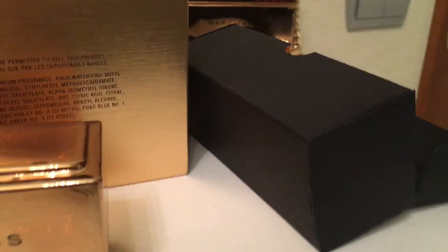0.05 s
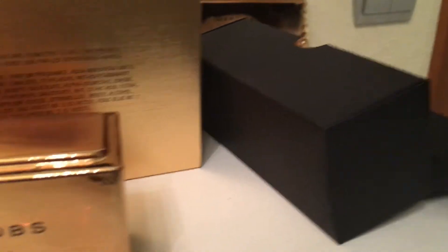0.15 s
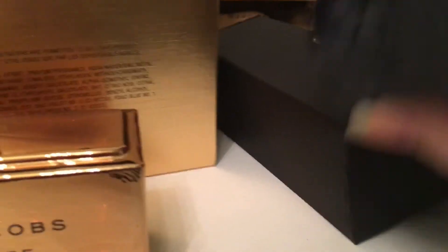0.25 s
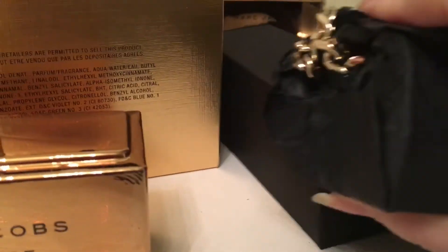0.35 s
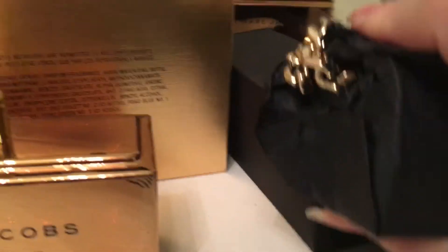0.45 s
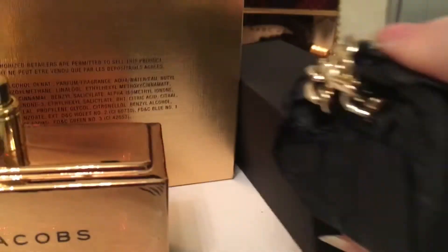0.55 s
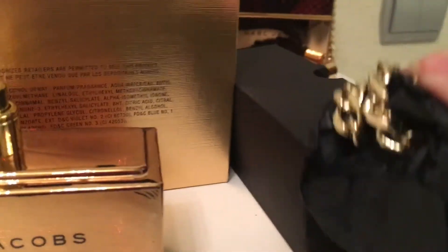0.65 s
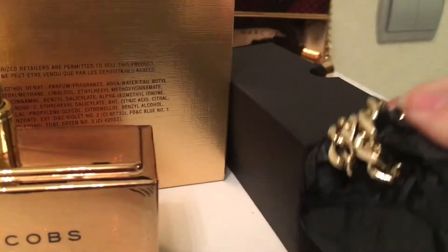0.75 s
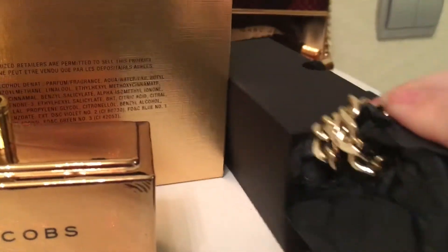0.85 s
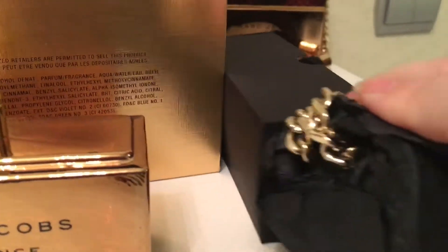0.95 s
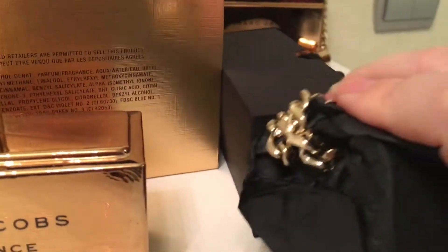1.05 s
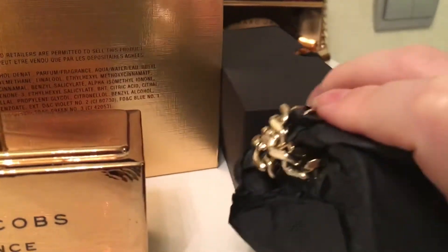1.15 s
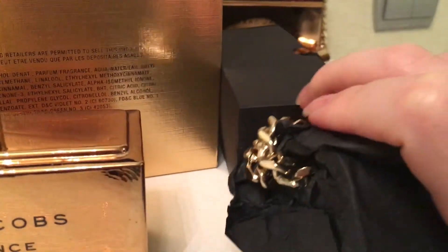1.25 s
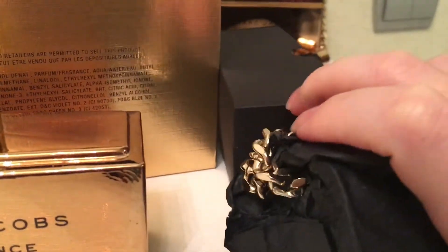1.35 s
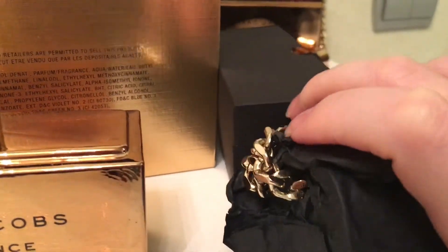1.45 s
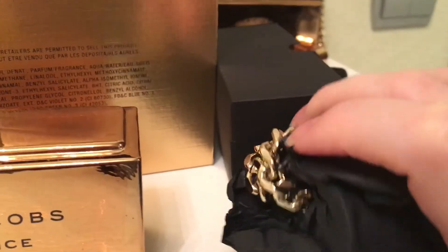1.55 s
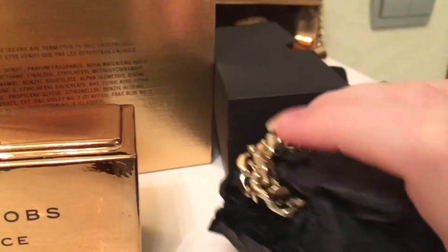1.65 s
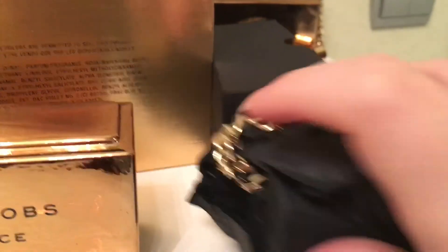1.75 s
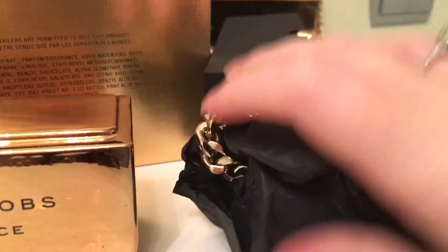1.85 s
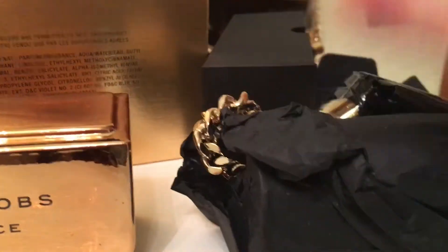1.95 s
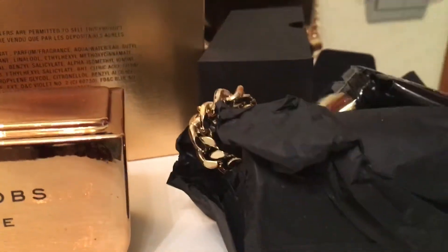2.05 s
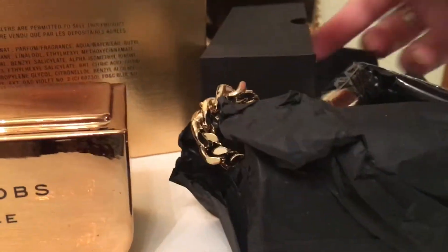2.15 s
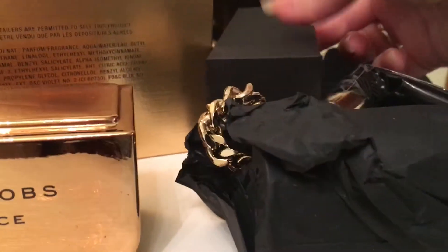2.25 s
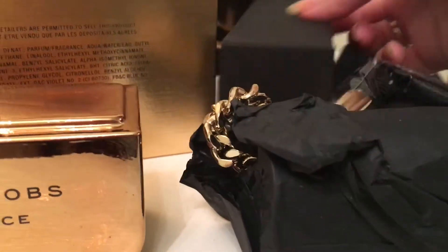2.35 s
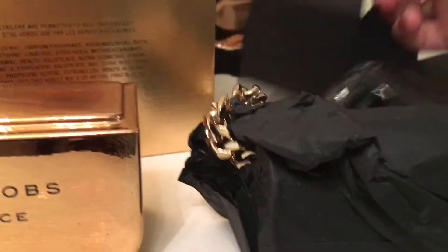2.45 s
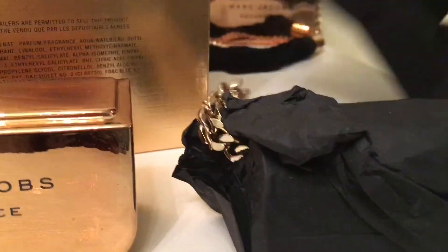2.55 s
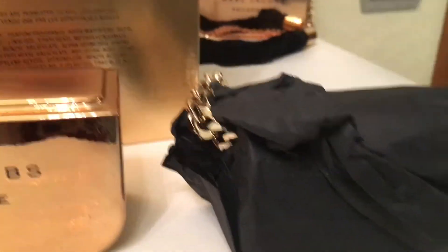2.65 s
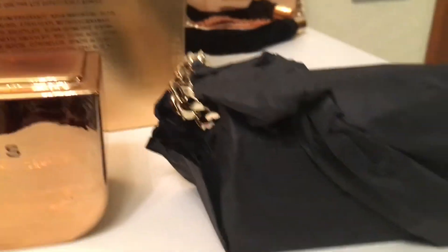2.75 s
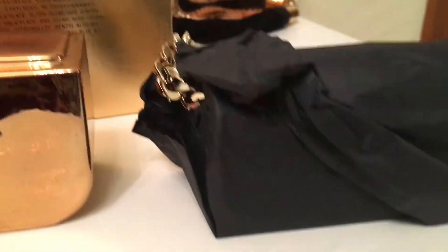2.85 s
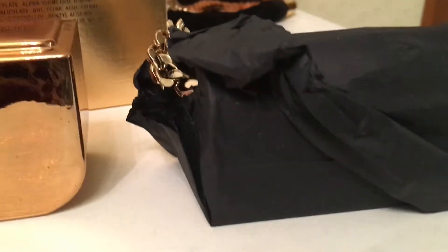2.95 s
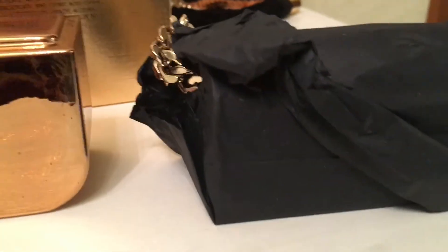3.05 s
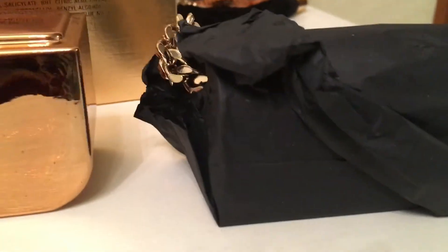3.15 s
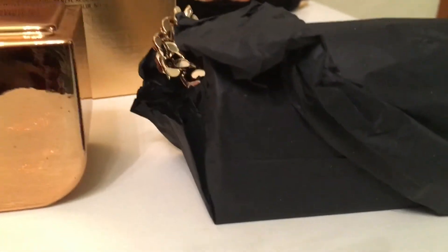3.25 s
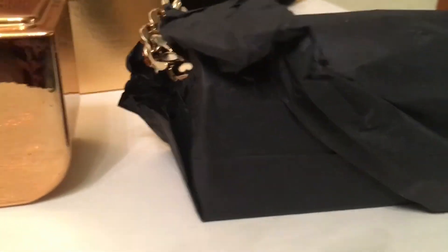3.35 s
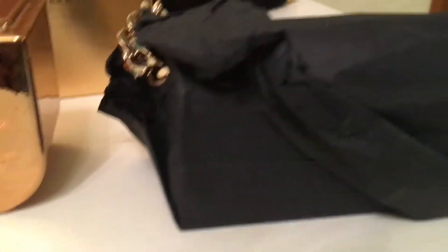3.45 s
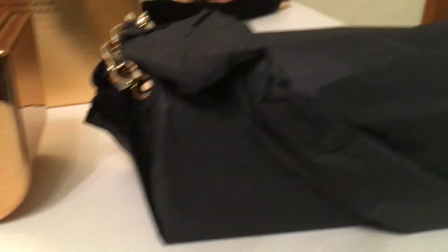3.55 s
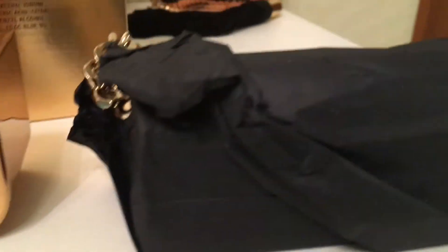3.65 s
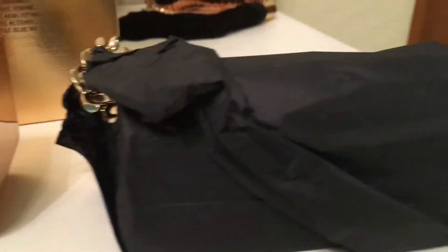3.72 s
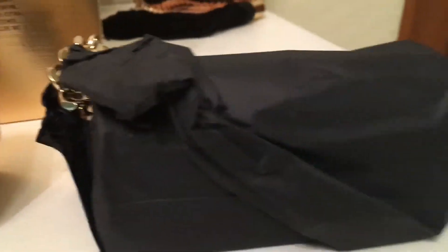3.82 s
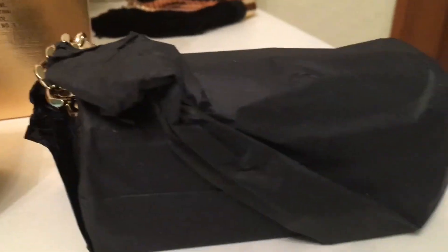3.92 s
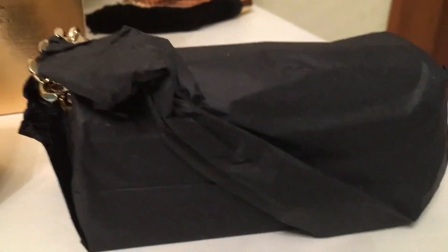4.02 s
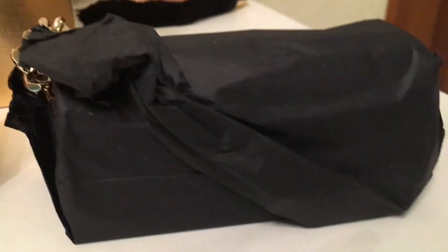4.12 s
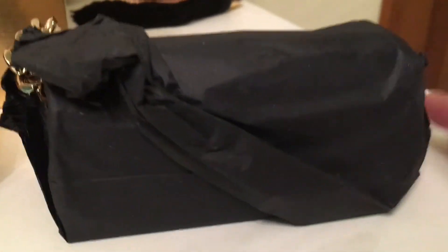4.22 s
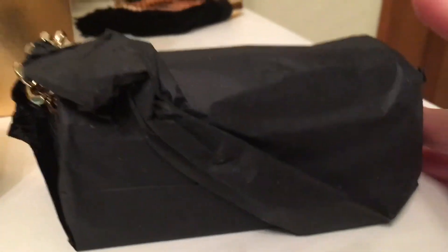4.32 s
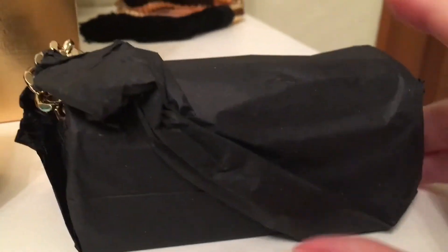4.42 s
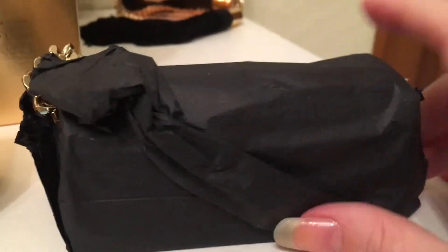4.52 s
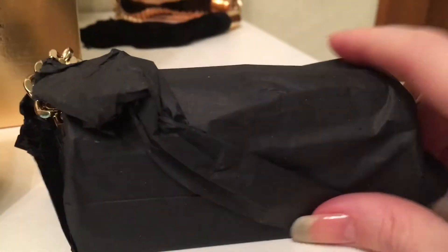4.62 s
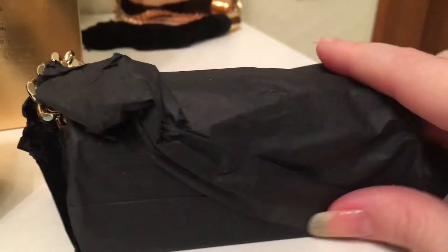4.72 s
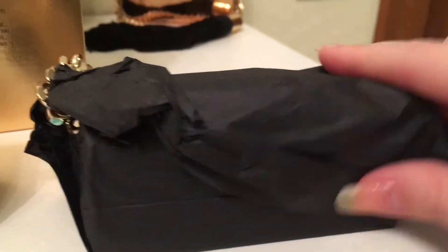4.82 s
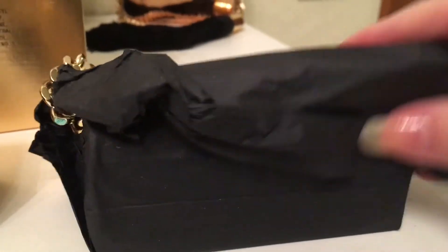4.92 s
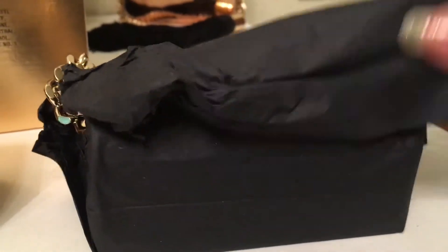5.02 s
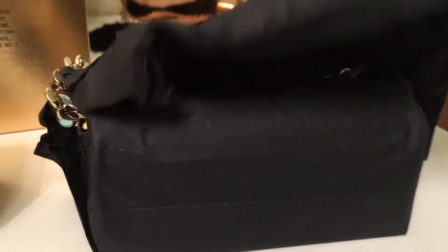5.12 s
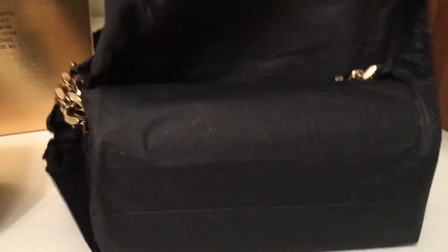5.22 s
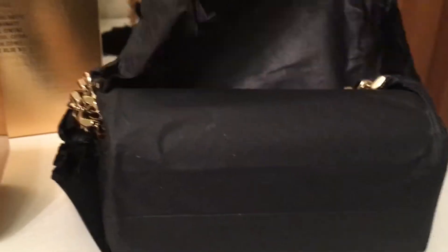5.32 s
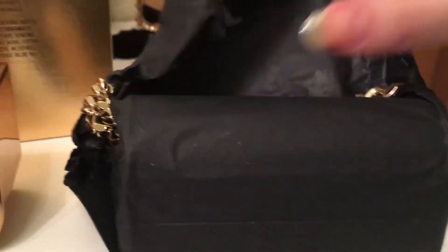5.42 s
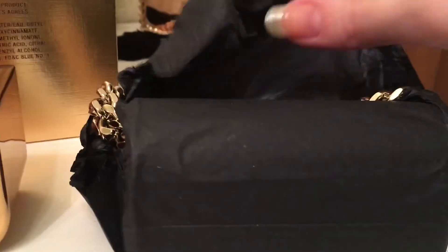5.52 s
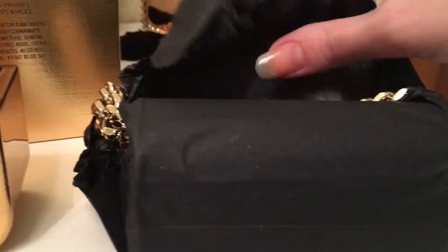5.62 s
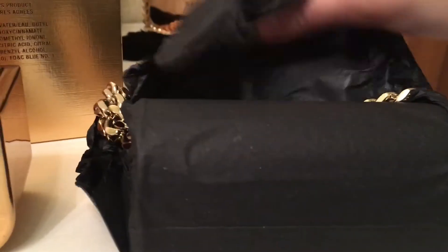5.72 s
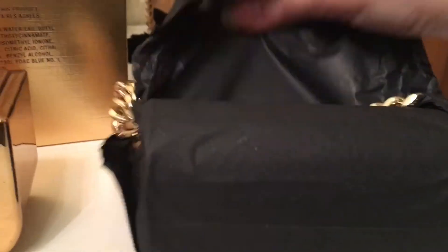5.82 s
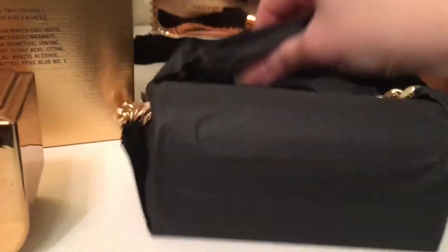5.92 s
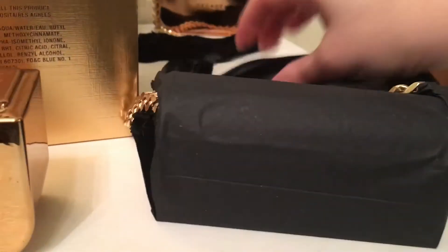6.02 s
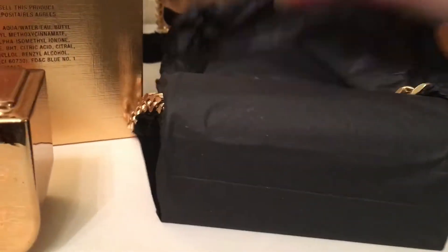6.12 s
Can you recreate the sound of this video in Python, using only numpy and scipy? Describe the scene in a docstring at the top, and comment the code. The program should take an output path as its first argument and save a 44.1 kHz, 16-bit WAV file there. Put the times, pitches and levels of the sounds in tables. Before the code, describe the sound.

Close crinkling tissue, soft padded thuds, a quiet pause broken by one hollow cardboard clack, then brisk, bright paper rustling in a quiet small room.

```python
"""Handbag unwrapped from tissue paper

Hands pull a handbag wrapped in thin tissue out of a gift box, close to the microphone; later the tissue is
peeled back. Tissue: flipping facets and rubbing noise, plus ticks, snaps and puffs of air. Bag: soft bumps
from damped table modes. Card: creaks and taps of band-passed noise; the empty box is put down a little
further off with a hollow knock. A small room of decaying noise answers, over a quiet ambience."""
import sys
import numpy as np
from scipy import signal
from scipy.fft import rfft, irfft, next_fast_len
from scipy.io import wavfile
from scipy.ndimage import uniform_filter1d, map_coordinates

SR = 44100
rng = np.random.default_rng(int(sys.argv[2]) if len(sys.argv) > 2 else 0)


def put_to_file(sound):
    """Save the sound as 16-bit audio at rate SR, in the file named by the first command-line argument."""
    columns = np.atleast_2d(sound).T  # one column per channel
    safe = np.clip(columns, -1, 1)
    whole_steps = np.round(safe * 32767)
    wavfile.write(sys.argv[1], SR, whole_steps.astype(np.int16))


N = 272538  # samples

# paper spectra: freq_hz, relative_db
SHEET_SPECTRUM = [(250, -33.5), (450, -31.5), (620, -2.5), (820, -3.5), (1100, 0), (1700, -0.5),
                  (2500, -1.5), (3400, -6), (4600, -6.5), (8000, -51)]
CREASE_SPECTRUM = [(1500, -45), (3000, -2.5), (4100, -2), (6400, 1.5), (9000, 1), (12500, 1), (15500, -5.5)]
FLAP_SPECTRUM = [(20, -37), (40, -7), (70, -4), (150, -4), (220, -2.5), (320, -5), (450, -8), (800, -14.5),
                 (2000, -89)]
BUCKLE_DB = -70.5  # crease level below which the paper mostly rubs


def tissue(sheet_db, hiss_db, flap_db, rub_db=-1, hiss_rub_db=-1, catch_db=2.0, flap_trim_db=-0.5):
    """Flipping facets over rubbing noise; buckling takes a larger share as the pull hardens."""
    fold_hz, fold_db = fold()
    pull = amp(hiss_db) + amp(-50)
    facets = crackle(pull, count=9000, size_spread_db=4.0, centre_hz=2350, spread=0.58, cycles=7.9)
    creases = crackle(pull, count=10000, size_spread_db=5.0, centre_hz=8750, spread=0.25, cycles=1.2)
    buckling = amp(hiss_db) / (amp(hiss_db) + amp(BUCKLE_DB))

    sheet_rub = amp(rub_db) * coloured(rng.standard_normal(N), SHEET_SPECTRUM)
    sheet = unit(buckling * unit(coloured(facets, SHEET_SPECTRUM)) + sheet_rub)
    sheet = folded(sheet, patchy_db=2, fold_hz=fold_hz, fold_db=fold_db)

    hiss_rub = amp(hiss_rub_db) * coloured(rng.standard_normal(N), CREASE_SPECTRUM)
    hiss = unit(buckling * unit(coloured(creases, CREASE_SPECTRUM)) + hiss_rub)
    hiss = folded(hiss, patchy_db=1.43)

    flap = coloured(rng.standard_normal(N), FLAP_SPECTRUM)
    catch = amp(catch_db * wobble(130))  # the sheet catches and slips
    rustle = catch * (amp(sheet_db) * sheet + amp(hiss_db) * hiss)
    return rustle + amp(flap_db + flap_trim_db) * flap


def crackle(pull, count, size_spread_db, centre_hz, spread, cycles, size=160):
    """Tiny facets flip over, each ringing at its own pitch; the harder the pull, the more of them."""
    starts = np.searchsorted(np.cumsum(pull) / np.sum(pull), rng.random(count)).clip(0, N - 1)
    # most buckles are tiny, a few are large; crowded ones share the energy
    sizes = amp(size_spread_db * np.minimum(rng.exponential(size=count), 4))
    sizes = sizes * rng.choice([-1, 1], count) / np.sqrt(pull[starts])
    hz = np.clip(centre_hz * np.exp(spread * rng.standard_normal((count, 1))), 300, SR / 2.6)
    turns = hz * np.arange(size) / SR
    # fade counted in turns: 60 dB in `cycles`
    grains = sizes[:, None] * np.sqrt(hz) * np.sin(2 * np.pi * turns) * fade(turns, cycles)
    places = starts[:, None] + np.arange(size)
    return unit(np.bincount(places.ravel(), grains.ravel(), N + size)[:N])


def folded(x, patchy_db, fold_hz=1500, fold_db=0, octaves=0.25):
    """The colour shifts as the paper changes shape: a moving resonance and passing patches."""
    hz, t, z = signal.stft(x, SR, nperseg=512)
    patches = uniform_filter1d(rng.standard_normal(z.shape), size=4, axis=0)
    patches = unit(uniform_filter1d(patches, size=9, axis=1))
    frames = np.minimum((t * SR).astype(int), N - 1)
    centre, height = [np.broadcast_to(c, N)[frames] for c in (fold_hz, fold_db)]
    distance = np.log2((hz[:, None] + 1) / centre) / octaves
    resonance_db = height * (np.exp(-distance ** 2 / 2) - .7)
    return signal.istft(z * amp(patchy_db * patches + resonance_db), nperseg=512)[1][:N]


# hand slides the tissue along, and at 3.476 s the box scrapes: start_s, length_s, rise_s, level_db,
# treble_rel_db, bass_rel_db, fold_pitch_hz, fold_prominence_db
SLIDES = [(0.035, .24, .005, -51, -1.5, -12, 1513, 2), (.43, .11, .025, -40.5, -9, -9.5, 1170, 2.5),
          (.57, .16, .02, -61, -2, -18, 1200, -1), (0.747, .27, .005, -48.5, -9, -5.5, 1120, -2),
          (1.01, .62, .02, -46, -4.5, -12, 1330, 4), (1.649, .26, .11, -38.5, -2.5, -11.5, 1750, 1.5),
          (2.334, .275, .045, -44, -5.5, -11, 1225, 3.5), (2.662, .81, .25, -62, -14, 1, 1270, 1.5),
          (3.476, .13, 0.0037, -47, -7, -5.5, 2530, 1.5), (3.66, .6, 0.06, -71, -4, 6.5, 1500, -3.5),
          (4.25, .25, .08, -47.5, -4, -17.5, 1630, 10.5), (4.53, .24, .03, -39, 0, -20, 1880, 6),
          (4.771, .455, .02, -37, 2.5, -13, 1540, 5.5), (5.25, .13, .03, -50, -1, -2.5, 1580, 0.5),
          (5.385, .275, .015, -45.5, 1, -8, 1570, -0.5), (5.649, .315, .06, -35, -2.5, -8.5, 1300, 0),
          (5.981, .05, .02, -48, -6, -12, 1210, 0)]
# brief tugs: peak_s, half_length_s, level_db, treble_rel_db, bass_rel_db
TUGS = [(.315, .018, -28.5, -.5, -8), (.535, .008, -35, -2, -7.5), (1.113, .015, -43, 0, -12),
        (1.414, .018, -42.5, 0, -26), (1.588, .022, -37, 2, -13), (1.881, .002, -30, -7, -25),
        (1.903, .012, -44, 4, -23), (2.44, .012, -38, -8, -4.5), (2.522, .006, -31, 0, -18),
        (2.934, .022, -47.5, -9, -29), (3.14, 0.013, -52, -13.5, -8), (3.263, 0.024, -53, -15.5, -7),
        (3.498, .011, -37, -7, -8.5), (4.495, .014, -39, -2, -24), (4.601, .016, -31, -.5, -16.5),
        (4.659, .008, -36, -1, -10), (4.79, .009, -31, 1, -36), (4.85, .016, -33.5, 2, -11.5),
        (5.004, .012, -42, 7, -20), (5.129, .01, -37.5, 3, -6), (5.213, .008, -35, -2, -4),
        (5.52, .01, -41, 4, -24), (5.708, .018, -33, 3, -6), (5.768, .009, -27, 2, -5),
        (5.85, .025, -36, -1, -11), (6.113, .014, -49, -3.5, -8.5)]
# paper at rest in the hand: sheet_db, creases_db, flapping_db
STILL_DB = [-71, -73, -88]
SETTLE_T60_S = .17  # after a slide
TUG_RELAX = 1.1  # sech release scale, in half lengths


def handling():
    """Slides build, hold and settle; tugs swell and relax; returns sheet, crease and flap levels in dB."""
    t = np.arange(N) / SR
    power = np.outer(amp(STILL_DB) ** 2, np.ones(N))
    for start_s, length_s, rise_s, db, treble_db, bass_db, _, _ in SLIDES:
        settling = fade(np.maximum(t - start_s - length_s, 0), SETTLE_T60_S)
        effort = np.clip((t - start_s) / rise_s, 0, 1) * settling
        power += np.outer(amp([db, db + treble_db, db + bass_db]) ** 2, effort ** 2)
    for peak_s, half_length_s, db, treble_db, bass_db in TUGS:
        u = np.clip((t - peak_s) / half_length_s, -20, 20)
        effort = np.where(u < 0, np.exp(-u ** 2 / 2), 1 / np.cosh(u / TUG_RELAX))
        power += np.outer(amp([db, db + treble_db, db + bass_db]) ** 2, effort ** 2)
    return 10 * np.log10(power)


def fold():
    """Pitch and prominence of the rubbed fold, gliding from mid-slide to mid-slide."""
    start_s, length_s, *_, hz, db = np.transpose(SLIDES)
    t = np.arange(N) / SR
    return [np.interp(t, start_s + length_s / 2, column) for column in (hz, db)]


TICK_FROM_DB = -66  # crease level above which ticks set in


def ticks(hiss_db, count=260, level_db=-55, follow=0.25, scatter_db=3.5, centre_hz=8500, spread=0.5,
          t60_s=0.0016):
    """Small creases give way one by one, standing out most under gentle handling."""
    moving = np.cumsum(np.clip(hiss_db - TICK_FROM_DB, 0, 8))
    track, t = np.zeros(N), np.arange(SR // 200) / SR
    for moment, size, pitch in rng.random((count, 3)):
        start = np.searchsorted(moving, moment * moving[-1])
        hz = np.clip(centre_hz * np.exp(spread * 2 * (2 * pitch - 1)), 2000, 14000)
        band = signal.butter(1, [hz * .6, hz * 1.4], "bandpass", fs=SR)
        tick = signal.lfilter(*band, rng.standard_normal(len(t)) * fade(t, t60_s))
        db = level_db + follow * (hiss_db[start] + 64) + scatter_db * 2 * (2 * size - 1)
        add(track, start / SR, amp(db) * onset_unit(tick, .004))
    return track


# creases that buckle with a snap: start_s, pitch_hz, ring_db, crack_db (ring before its trim)
SNAPS = [(.0335, 3550, -28, -25.5), (.1185, 2356, -56.5, -39), (.141, 2640, -49, -38),
         (.2228, 2955, -37, -39), (.368, 1770, -29, -42), (.3864, 2490, -42, -33.5),
         (.7355, 1563, -42, -46), (.5413, 1980, -33, -34), (.799, 3820, -40.5, -38),
         (1.0287, 2900, -27, -39), (1.0392, 1700, -27, -29.5), (1.0606, 3540, -26, -33),
         (1.0847, 2530, -28.5, -31.5), (1.111, 2750, -18, -38), (1.124, 2290, -53, -22.5),
         (1.3021, 2800, -25, -44), (1.344, 3100, -27, -37), (1.4051, 1560, -27, -31.5),
         (1.4565, 3360, -29, -31.5), (1.836, 3860, -27, -33), (1.8803, 1930, -28.5, -45),
         (1.9719, 1540, -43, -40), (2.1036, 2330, -40.5, -45.5), (2.1505, 2210, -55, -52),
         (2.1644, 2920, -58, -44), (2.3631, 5460, -31, -34.5), (2.4277, 1520, -31, -57),
         (2.444, 1270, -18, -49), (2.5241, 1050, -17.5, -32), (2.528, 1880, -23, -23),
         (2.6077, 3020, -32.5, -35.5), (3.184, 1260, -45, -51), (3.3764, 3670, -47, -43),
         (4.4372, 2060, -29.5, -63.5), (4.5049, 3120, -29, -25), (4.5122, 3100, -24.5, -31.5),
         (4.544, 2500, -45, -24), (4.6583, 1740, -28.5, -36), (4.7051, 2410, -28, -29),
         (4.792, 1690, -46, -27.5), (4.863, 2900, -18.5, -21.5), (5.019, 2540, -26.5, -27.5),
         (5.21, 2130, -23.5, -44), (5.708, 2120, -48, -21.5), (5.8102, 2480, -22, -45)]
# crack spectrum: freq_hz, relative_db
CRACK_SPECTRUM = [(800, -49), (3000, -1.5), (6500, 0), (9000, -1.5), (13000, -4), (16000, -8.5)]


def snaps(rows, cycles=8, crack_t60_s=0.0062, shiver_t60_s=0.025, shiver_db=-16, ring_trim_db=-4,
          thin_hz=3200, thin_db=14):
    """A crease gives way with a bright crack and a short shiver; the facet beside it rings briefly."""
    rings, cracks, t = np.zeros(N), np.zeros(N), np.arange(SR // 40) / SR
    for start_s, hz, ring_db, crack_db in rows:
        facet = np.sin(2 * np.pi * hz * t) * fade(t, cycles / hz)
        decay = fade(t, crack_t60_s) + amp(shiver_db) * fade(t, shiver_t60_s)
        crack = rng.standard_normal(len(t)) * decay
        # the less the facet rings, the thinner the crack
        edge_hz = np.clip(thin_hz * 2 ** ((crack_db - ring_db) / thin_db), 800, 9000)
        crack = signal.lfilter(*signal.butter(1, edge_hz, "highpass", fs=SR), crack)
        add(rings, start_s, amp(ring_db + ring_trim_db) * onset_unit(facet, .004))
        add(cracks, start_s, amp(crack_db) * onset_unit(crack, .004))
    # such small facets radiate little bass
    rings = signal.lfilter(*signal.butter(2, 800, "highpass", fs=SR), rings)
    return rings + coloured(cracks, CRACK_SPECTRUM)


def small_snaps(hiss_db, count=70, level_db=-38, follow=0.44, scatter_db=3, crack_rel_db=-2, centre_hz=2400,
                spread=0.46):
    """Lesser creases give way at random as the paper moves, louder under a harder pull: rows like SNAPS."""
    moving = np.cumsum(np.clip(hiss_db + 58, 0, 6))
    moments = (np.arange(count) + rng.random(count)) / count
    starts = np.searchsorted(moving, moments * moving[-1])
    pitch, ringing, cracking = rng.standard_normal((count, 3)).clip(-2, 2).T
    db = level_db + follow * (hiss_db[starts] + 48)
    hz = centre_hz * np.exp(spread * pitch)
    return list(zip(starts / SR, hz, db + scatter_db * ringing, db + crack_rel_db + scatter_db * cracking))


# lifted sheet wafts air at the microphone: peak_s, half_length_s, level_db
WAFTS = [(5.128, 0.06, -51), (5.715, 0.017, -37), (5.78, 0.018, -46), (5.924, 0.028, -47)]
WAFT_HZ = 68


def wafts(width=0.58):
    """A broad sheet swung through the air gives a soft, low puff: swelling band-passed noise."""
    t = np.arange(N) / SR
    push = sum(amp(db) * np.exp(-((t - peak_s) / half_length_s) ** 2 / 2) for peak_s, half_length_s, db in WAFTS)
    band = signal.butter(2, [WAFT_HZ / (1 + width), WAFT_HZ * (1 + width)], "bandpass", fs=SR)
    return push * unit(signal.lfilter(*band, rng.standard_normal(N)))


# soft bumps on the table: start_s, level_db (before trim), contact_brightness_hz
BUMPS = [(0.052, -46.5, 438), (0.278, -31.5, 422), (.748, -34.5, 1030), (.8, -40, 600), (0.879, -39.5, 993),
         (.938, -20, 845), (1.602, -17, 824), (2.525, -32, 243), (2.586, -49, 300), (2.667, -43.5, 1110),
         (2.81, -48.5, 129), (5.074, -36.5, 248), (5.232, -23.5, 221)]
# table top modes: freq_hz, relative_db, t60_s
TABLE_MODES = [(134.5, 4, 0.09), (177, 3, 0.062), (223, -1, 0.13), (268, 0, 0.086), (340, 7.5, 0.082),
               (420, -14, 0.16), (498, -3.5, 0.077), (696, 12, 0.041), (793, 9.5, 0.036)]


def bumps(trim_db=2, press_s=0.00028, room_db=-15):
    """The padded bag excites the table modes; the softer the contact, the duller the thud."""
    track, t = np.zeros(N), np.arange(SR // 3) / SR
    for start_s, db, contact_hz in BUMPS:
        modes = ring(TABLE_MODES, t, scatter_db=.7)
        softness = signal.butter(2, contact_hz, fs=SR)
        thud = signal.lfilter(*softness, modes * (1 - np.exp(-t / press_s)))
        add(track, start_s, amp(db + trim_db) * onset_unit(thud, .006))
    # a small table top radiates little below its first mode
    track = signal.lfilter(*signal.butter(2, 85, "highpass", fs=SR), track)
    return track + amp(room_db) * room(track)


# box lands on one edge, then flat: start_s, level_db (before trims)
LANDING = [(3.622, -15), (3.6261, -20)]
# hollow cardboard box modes: freq_hz, relative_db, t60_s
BOX_MODES = [(217, -16.5, .1), (320.6, -10.5, 0.21), (415, -15, 0.099), (444, -14, 0.073), (498, -11, .06),
             (570, -8.5, 0.15), (1076, 1, 0.086), (1380, 5, 0.013), (1740, 1.5, 0.024), (2060, 2.5, 0.022),
             (2183, 12.5, 0.017)]
# clack spectrum: freq_hz, relative_db
CLACK_SPECTRUM = [(100, -30.5), (200, -16.5), (350, -1), (600, 3), (820, -8), (1100, 5.5), (2250, -5),
                  (2900, -12), (4200, -15), (5000, -19.5), (7000, -22.5), (10000, -29), (16000, -24)]


def box(walls_db=-5, clack_t60_s=0.036, wall_room_db=-4, clack_room_db=1):
    """The empty box lands further off: a dry clack, the ring of its walls and much room."""
    walls, clacks, t = np.zeros(N), np.zeros(N), np.arange(SR * 2 // 3) / SR
    for start_s, db in LANDING:
        add(walls, start_s, amp(db + walls_db) * onset_unit(ring(BOX_MODES, t, scatter_db=1), .006))
        clack = rng.standard_normal(len(t)) * fade(t, clack_t60_s)
        add(clacks, start_s, amp(db) * onset_unit(clack, .006))
        add(clacks, start_s, amp(db + clack_room_db) * onset_unit(room_tail(), .006))
    return walls + amp(wall_room_db) * room(walls) + coloured(clacks, CLACK_SPECTRUM)


# cardboard box grazed or nudged: start_s, level_db, pitch_hz, t60_s
TAPS = [(.7485, -34, 1210, 0.036), (0.8772, -38, 1360, 0.024), (2.295, -49, 1490, .04),
        (2.6679, -43, 1110, 0.023), (2.6875, -44, 1360, 0.032), (3.479, -30, 2980, .06),
        (3.5005, -34.5, 3340, 0.045), (3.5783, -35.5, 2600, .04)]


def taps(width=0.39, room_db=-7):
    """Light contacts on card: a short burst of noise in one broad band."""
    track, t = np.zeros(N), np.arange(SR // 10) / SR
    for start_s, db, hz, t60_s in TAPS:
        band = signal.butter(2, [hz / (1 + width), hz * (1 + width)], "bandpass", fs=SR)
        burst = signal.lfilter(*band, rng.standard_normal(len(t)) * fade(t, t60_s))
        add(track, start_s, amp(db) * onset_unit(burst, .006))
    return track + amp(room_db) * room(track)


# cardboard rubs with a brief hoarse creak: peak_s, half_length_s, pitch_hz, level_db
CREAKS = [(0.133, 0.0067, 1920, -37), (0.343, 0.0044, 640, -34.5), (2.434, 0.0063, 1310, -32),
          (2.441, 0.0069, 1280, -30), (3.149, 0.0092, 1200, -43), (3.437, 0.008, 2390, -50.5),
          (5.812, 0.0049, 2570, -28), (5.839, 0.015, 1750, -38), (5.84, 0.0077, 756, -34)]


def creaks(width=0.12):
    """Quick stick and slip, as swelling noise, in one narrow resonance of the card."""
    track, t = np.zeros(N), np.arange(N) / SR
    for peak_s, half_length_s, hz, db in CREAKS:
        tone = signal.lfilter(*signal.iirpeak(hz, 1 / width, fs=SR), rng.standard_normal(N))
        swell = np.exp(-((t - peak_s) / half_length_s) ** 2 / 2)
        track += amp(db) * onset_unit(tone * swell, 2 * half_length_s)
    return track


# ambience spectrum: freq_hz, relative_db
AMBIENT_SPECTRUM = [(20, -25), (60, 7), (130, 2.5), (250, -1), (500, -5.5), (1500, -8.5), (3000, -19),
                    (5000, -31), (15500, -50.5)]


def ambient(level_db=-65.0):
    """The quiet room: steady coloured noise."""
    return amp(level_db) * coloured(rng.standard_normal(N), AMBIENT_SPECTRUM)


# room decay: freq_hz, t60_s
ROOM_DECAY = [(100, 0.42), (400, 0.37), (1500, 0.37), (4000, 0.41), (8000, 0.41), (16000, 0.2)]


def room_tail(build_up_s=0.0029):
    """The answer of a small furnished room: noise, each frequency dying at its own speed."""
    hz, t, z = signal.stft(rng.standard_normal(SR * 2 // 3), SR, nperseg=256)
    tail = signal.istft(z * fade(t, along(ROOM_DECAY, hz)[:, None]), SR, nperseg=256)[1]
    tail = tail * (1 - np.exp(-np.arange(len(tail)) / SR / build_up_s))
    return tail / np.linalg.norm(tail)


def room(x):
    """x as it comes back from the room."""
    return signal.fftconvolve(x, room_tail())[:N]


def ring(modes, t, scatter_db):
    """Damped modes with alternating signs, struck at new strengths each time."""
    hz, db, t60_s = np.transpose(modes)[:, :, None]
    sign = (-1) ** np.arange(len(modes))[:, None]
    strength = sign * amp(db + scatter_db * rng.standard_normal(db.shape))
    return np.sum(strength * fade(t, t60_s) * np.sin(2 * np.pi * hz * t), axis=0)


def amp(db):
    """Decibels to gain."""
    return 10 ** (np.asarray(db) / 20)


def unit(x):
    """x at rms 1."""
    return x / np.sqrt(np.mean(x ** 2) + 1e-20)


def onset_unit(x, span_s):
    """x scaled to hold as much energy as span_s seconds at rms 1."""
    return x * np.sqrt(span_s * SR / (np.sum(x ** 2) + 1e-20))


def fade(t, t60):
    """A decay of 60 dB over t60, in the unit of t."""
    return np.exp(-np.log(1000) * t / t60)


def wobble(rate_hz):
    """A smooth random curve, rate_hz knots a second."""
    return map_coordinates(rng.standard_normal(N // 16), [np.arange(N) * rate_hz / SR], mode="wrap")


def add(track, start_s, sound):
    """Mix a sound into the track at start_s."""
    start = max(0, round(start_s * SR))
    track[start:start + len(sound)] += sound[:max(0, len(track) - start)]


def along(points, hz):
    """(Hz, value) points read on a log frequency axis."""
    f, v = np.transpose(points)
    return np.interp(np.log(hz + 1), np.log(f), v)


def filtered(x, response):
    """x times a response of frequency."""
    size = next_fast_len(len(x) + 8192)
    return irfft(rfft(x, size) * response(np.fft.rfftfreq(size, 1 / SR)), size)[:len(x)]


def coloured(x, spectrum, size=4096):
    """x through a causal minimum-phase filter of energy 1 with the given spectrum."""
    cepstrum = irfft(np.log(amp(along(spectrum, np.fft.rfftfreq(size, 1 / SR)))))
    # fold the cepstrum onto positive time: minimum phase
    cepstrum[1:size // 2] *= 2
    cepstrum[size // 2 + 1:] = 0
    kernel = irfft(np.exp(rfft(cepstrum)))
    return signal.fftconvolve(x, kernel / np.linalg.norm(kernel))[:len(x)]


def scene():
    """Paper and bag are close and fairly dry, over a quiet room."""
    sheet_db, hiss_db, flap_db = handling()
    paper = tissue(sheet_db, hiss_db, flap_db) + ticks(hiss_db)
    paper = paper + snaps(list(SNAPS) + small_snaps(hiss_db)) + creaks()
    close = paper + amp(-14.5) * room(paper) + wafts() + bumps()
    return (close + taps() + box() + ambient())[None]


# microphone port dips: centre_hz, width_hz, depth_db
PORT_DIPS = [(4880, 360, -3.5), (7600, 440, -3), (10470, 640, -3.5)]
TOP_HZ = 15900  # band limit


def record(dry):
    """The microphone port carves dips into the treble; a steep low-pass sets the band limit."""
    def response(hz):
        dips_db = sum(db * np.exp(-((hz - centre_hz) / width_hz) ** 2) for centre_hz, width_hz, db in PORT_DIPS)
        return amp(dips_db) / np.sqrt(1 + (hz / TOP_HZ) ** 200)
    return filtered(dry[0], response)[None]


dry = scene()
out = record(dry)
put_to_file(out)
```